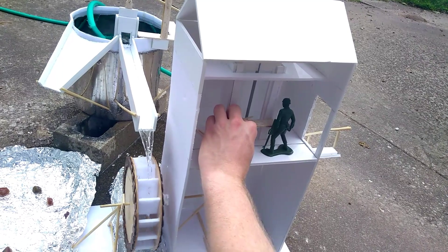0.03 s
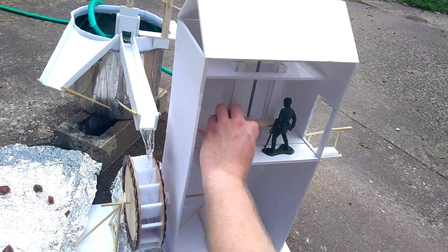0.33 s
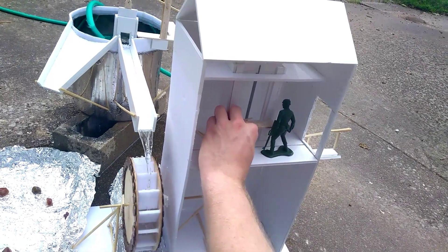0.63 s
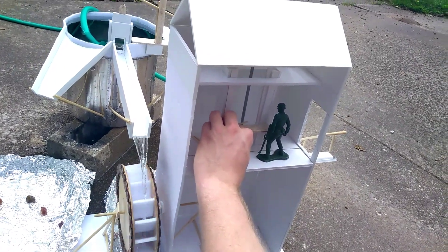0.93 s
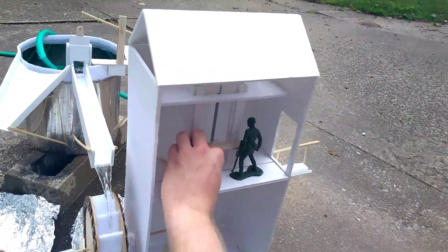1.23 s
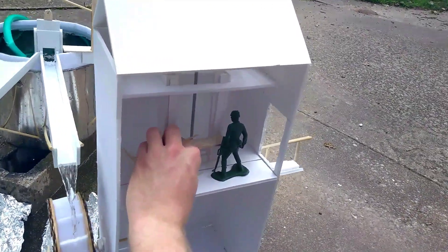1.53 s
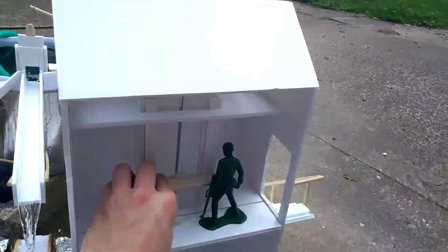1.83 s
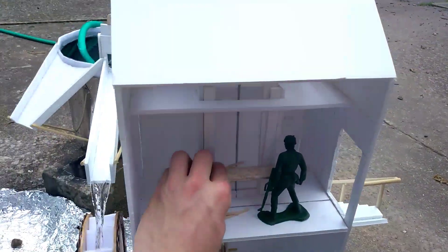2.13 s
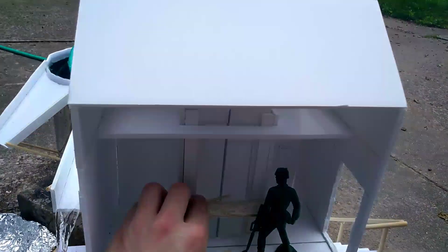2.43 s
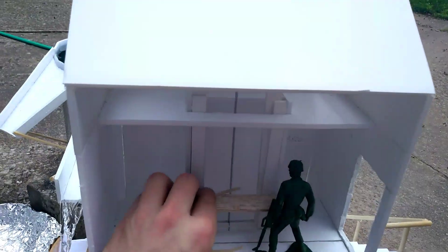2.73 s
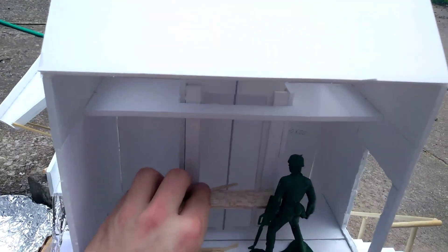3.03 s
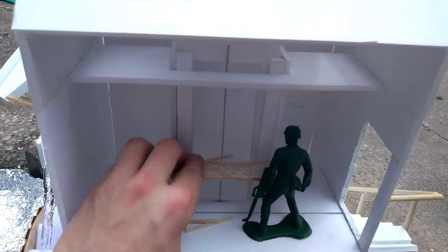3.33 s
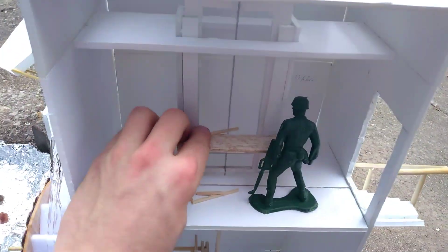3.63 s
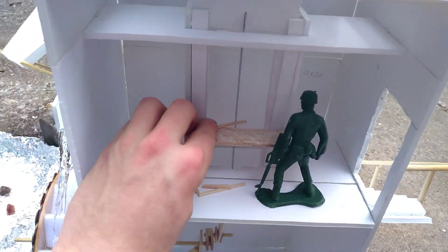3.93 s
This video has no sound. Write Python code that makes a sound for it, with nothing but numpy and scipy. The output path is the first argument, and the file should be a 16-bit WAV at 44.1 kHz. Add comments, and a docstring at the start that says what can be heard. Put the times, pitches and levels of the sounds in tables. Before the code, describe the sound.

A small hacksaw rasps through wood close by, with seven gritty cutting strokes about 0.6 seconds apart, each followed by a softer return. The teeth snag around 1.2 seconds, and the linkage knocks hollowly near 0.7, 1.2, 1.9, 2.4, 3.1 and 4 seconds. Water pours quietly over a wheel throughout, dipping between 2.5 and 3.3 seconds. A low hum fades out by 0.7 seconds.

```python
"""A small hacksaw rasps up and down through a stick of wood, driven by the water wheel of a model mill.
Each turn gives a cutting stroke that swells as the teeth tear fibres and snag, a rattle of the
linkage and a softer return stroke. Blade and wood ring, and the thin housing booms along.
Close by, outdoors, water pours over the wheel and runs off; a low hum dies away early on."""
import sys
import numpy as np
from scipy import signal
from scipy.fft import rfft, irfft, next_fast_len
from scipy.io import wavfile

SR = 44100
rng = np.random.default_rng(int(sys.argv[2]) if len(sys.argv) > 2 else 0)


def waveform_to_disk(signal):
    """Save audio, clipped to [-1, 1], as 16-bit WAV at the path in sys.argv[1]."""
    frames = np.transpose(np.atleast_2d(signal))
    scaled = np.clip(frames, -1, 1) * 32767
    samples = np.round(scaled).astype(np.int16)
    wavfile.write(sys.argv[1], SR, samples)


N = 176400

# Cutting strokes (start [s], peak [s], end [s], rasp level [dB], housing level [dB], wood ring [dB],
# blade ring [Hz], its width [Hz], its boost [dB], treble tilt [dB/octave])
CUT_STROKES = [(-.14, 0.047, .15, -31.5, -32.5, 14, 5650, 1500, 5.5, 1.5),
               (0.431, 0.595, .66, -25.5, -30.5, 18, 5770, 1400, 5, 2),
               (1.01, 1.164, 1.29, -27, -31, 14, 6470, 2600, 10, 1.4),
               (1.609, 1.785, 1.852, -23, -30.5, 13, 5230, 700, 1, -0.2),
               (2.238, 2.399, 2.456, -24.5, -33.5, 19, 8400, 700, 8, 0),
               (2.872, 3.084, 3.135, -30, -40, 14, 4940, 1200, 0, -1),
               (3.55, 3.735, 3.82, -26, -36, 11, 8200, 2000, 0, -1.1)]
# Return strokes (same columns)
RETURN_STROKES = [(0.128, 0.279, .45, -32.5, -35, 4.6, 5440, 1500, 5.4, 0.25),
                  (0.741, 0.864, 1.03, -32, -36.5, 8.9, 5550, 1700, 11.5, 0.45),
                  (1.37, 1.464, 1.63, -30, -38, 2.6, 5700, 550, 11.6, -1),
                  (1.96, 2.072, 2.3, -30.5, -39.5, 14, 5230, 1500, 1.5, -1.4),
                  (2.608, 2.687, 2.9, -43, -48, 16, 4830, 800, 2.1, -1.4),
                  (3.259, 3.35, 3.54, -37, -42, 11, 4450, 800, 3.6, -2.1),
                  (3.872, 3.945, 4.1, -38.5, -41, 8, 4630, 800, 5.1, -1)]
PAD_S = .015  # room for the fade at each end of a stroke


def saw():
    """The wheel drives the blade through the wood: a hard cut, then a lighter return."""
    out = silence()
    for row in CUT_STROKES:
        add(out, row[0] - PAD_S, stroke(*row, ends_db=-21, attack_curve=1.25, hold=2.6))
    for row in RETURN_STROKES:
        add(out, row[0] - PAD_S, stroke(*row, ends_db=-16, attack_curve=1.8, hold=1.6))
    return out


def stroke(start, peak, end, rasp_db, housing_db, wood_db, ring_hz, width_hz, ring_db, tilt_db,
           ends_db, attack_curve, hold):
    """One pass of the blade swells and stops; a higher hold keeps the pressure on for longer."""
    t = np.arange(start - PAD_S, end + PAD_S, 1 / SR)
    off_peak = np.interp(t, [start, peak, end], [1, 0, 1])
    swell_db = ends_db * off_peak ** np.where(t < peak, attack_curve, hold)
    fade = np.clip(np.minimum(t - t[0], t[-1] - t) / (2 * PAD_S), 0, 1)
    grit = teeth(speed=np.sqrt(amp(swell_db)))
    tuning = 1 + .0035 * rng.uniform(-1.1, 1)  # blade tension varies from stroke to stroke
    tone = (tuning, wood_db, tilt_db, ring_hz, width_hz)
    rasp = blade_and_wood(unit(noise(len(t)) * grit), *tone, ring_db)
    catches = blade_and_wood(snags(t, start, end), *tone, ring_db + 9)  # snags ring the blade harder
    boom = housing_boom(grit) * amp(housing_db + .56 * swell_db)  # swells less than the rasp
    return catches + housing_walls(fade * rasp * amp(rasp_db + swell_db)) + fade * boom


def teeth(speed, teeth_per_s=125, bite_decay_s=.0009, chatter_per_s=160):
    """Grit envelope: teeth tear fibres in uneven bursts while the blade chatters against the wood."""
    size = len(speed)
    tooth_rate = teeth_per_s * speed * np.exp(.65 * wander(size, teeth_per_s))
    new_tooth = np.diff(np.floor(np.cumsum(tooth_rate) / SR), prepend=0)
    depth, fibre = rng.standard_normal((2, size))
    hits = new_tooth * amp(4.5 * np.clip(depth, -2, 1))
    bites = signal.lfilter([1], [1, -np.exp(-1 / (bite_decay_s * SR))], hits)
    fibre_db = 3 * np.clip(fibre, -2, 2)
    chatter_db = 2 * speed * wander(size, chatter_per_s)
    return amp(fibre_db + chatter_db) * (1 + 2.93 * speed * bites)


# Tone of the rasp (frequency [Hz], level [dB])
RASP_EQ = [(100, -27), (600, -8), (1150, -15), (1600, 3.5), (2100, -8), (2550, 4.5), (2950, -1),
           (3500, 0.5), (4400, -0.5), (5100, 0.5), (6400, -0.5), (7400, 0), (9200, -2), (10700, -3.5),
           (11900, -4.5), (12600, 0), (14100, -13.5), (14700, -76)]
# Narrow modes of the steel blade (frequency [Hz], boost [dB])
BLADE_MODES = [(5231, 8), (5760, 7.5), (6030, 2), (7100, 7.5), (7680, 0), (8090, 4)]
BLADE_WIDTH_HZ, WOOD_HZ, WOOD_WIDTH_HZ = 50, 2090, 240


def blade_and_wood(scrape, tuning, wood_db, tilt_db, ring_hz, width_hz, ring_db):
    """Scraping excites the blade's narrow modes, its broad ring and the resonance of the stick."""
    peaks = [(hz * tuning, BLADE_WIDTH_HZ, db) for hz, db in BLADE_MODES]
    peaks += [(WOOD_HZ, WOOD_WIDTH_HZ, wood_db), (ring_hz, width_hz, ring_db)]
    return colour(scrape, RASP_EQ, tilt_db, peaks)


# Teeth catching in the wood (time [s], level [dB])
SNAG_HITS = [(0.506, -20), (0.591, -17), (0.608, -18.5), (0.778, -21.5), (0.826, -14), (.875, -15.5),
             (1.112, -12.5), (1.129, -8.5), (1.144, -14), (1.162, -13), (1.1725, -9.5), (1.188, -17),
             (1.2, -6.5), (1.2081, -6.5), (1.215, -9), (1.2186, -13), (1.231, -13), (1.2566, -8),
             (1.269, -13.5), (1.722, -14), (2.352, -10), (2.377, -11), (2.407, -14), (3.328, -22.5),
             (3.367, -25), (3.701, -16), (3.759, -16), (3.769, -18.5)]


def snags(t, start, end, rise_s=.0011, decay_s=.0017):
    """Each tooth that catches during the stroke gives a sharp tick of noise."""
    envelope = sum(amp(db) * np.clip((t - s) / rise_s, 0, 1) * np.exp(-abs(t - s) / decay_s)
                   for s, db in SNAG_HITS if start < s < end)
    return noise(len(t)) * envelope


# Knocks of the linkage (time [s], level [dB], decay [s])
KNOCK_HITS = [(0.6578, -16, 0.0091), (0.69, -13.5, 0.0053), (0.6995, -19, 0.0062), (1.2434, -17, 0.012),
              (1.8477, -10.5, 0.0045), (1.8556, -15, 0.0088), (1.896, -28, 0.0074), (2.4224, -8.5, 0.005),
              (2.429, -11, 0.0048), (2.4653, -11.5, 0.0042), (2.473, -15.5, 0.0087), (2.501, -24.5, 0.012),
              (3.123, -17, 0.0055), (3.1415, -10, 0.0048), (3.1654, -14.5, 0.010), (3.9745, -14, 0.0097)]
# Tone of their crack (frequency [Hz], level [dB])
CRACK_EQ = [(100, -14.5), (600, 0), (1100, -10.5), (1550, 3), (2050, 14), (2600, 6.5), (3400, -4),
            (4500, 0.5), (5600, 2), (8000, 0.5), (10000, -2.5), (13000, -7), (15800, -28)]


def linkage_knocks(rise_s=.00062):
    """The linkage knocks with short cracks as the blade turns round."""
    cracks, t = silence(), np.arange(SR // 6) / SR
    for s, db, decay_s in KNOCK_HITS:
        envelope = np.minimum(t / rise_s, 1) * np.exp(-t / decay_s)
        add(cracks, s, amp(db) * envelope * noise(len(t)))
    return colour(cracks, CRACK_EQ)


# Broad body of the housing (frequency [Hz], level [dB])
HOUSING_EQ = [(40, -23), (110, -3), (200, -6), (300, -7.5), (400, -6.5), (510, -0.5), (700, -1.5),
              (950, -4.5), (1200, -10), (1700, -11.5), (2500, -24), (6000, -57.5)]
# Its modes (frequency [Hz], level [dB], time to fall 60 dB [s])
HOUSING_MODES = [(260, -9, 0.19), (332.7, -4.5, 0.14), (488, -4.5, 0.15), (524.3, -2, 0.11),
                 (648.6, -1, 0.11), (766.2, 1, 0.11), (950, -9, 0.18), (1580, -10.5, 0.044),
                 (1866, -5, 0.083)]


def housing_boom(grit):
    """The sawing shakes the thin housing: ringing modes over a dull rush."""
    shake = unit(noise(len(grit)) * grit)
    ring = sum(amp(db) * resonate(shake, hz, width_hz=np.log(1000) / np.pi / t60)
               for hz, db, t60 in HOUSING_MODES)
    return unit(colour(noise(len(grit)), HOUSING_EQ) + amp(-.5) * unit(ring))


# Heavier blows of the linkage (time [s], level [dB], struck pitch [Hz], damping time [s])
THUMP_HITS = [(0.6574, -20.5, 710, 0.1), (0.691, -22.5, 527, .03), (1.244, -20.5, 520, 0.15),
              (1.856, -17, 266, 0.05), (2.474, -28.5, 715, 0.077), (3.143, -27.5, 300, 0.054),
              (3.974, -23.5, 700, .05)]


def housing_thumps(rise_s=.0065, focus_db_per_octave=6.5, detune=.03):
    """Each blow lands on a different spot of the housing and favours the modes near its pitch."""
    thumps, t = silence(), np.arange(SR // 6) / SR
    for s, thump_db, struck_hz, damping_s in THUMP_HITS:
        ring = 0
        for hz, db, t60 in HOUSING_MODES:
            gain = amp(db - focus_db_per_octave * abs(np.log2(hz / struck_hz)))
            bent_hz = hz * (1 + detune * rng.uniform(-1, 1))
            ring += gain * amp(-60 * t / t60) * np.sin(2 * np.pi * (bent_hz * t + noise(1)))
        envelope = np.minimum(t / rise_s, 1) * np.exp(-t / damping_s)
        add(thumps, s, amp(thump_db) * envelope * ring)
    return thumps


def housing_walls(x, decay_s=.0026, wet_db=2):
    """Quick reflections inside the housing colour each stroke a little differently."""
    t = np.arange(SR // 60) / SR
    taps = noise(len(t)) * np.exp(-t / decay_s)
    taps *= amp(wet_db) / np.linalg.norm(taps, axis=1, keepdims=True)
    taps[:, 0] += 1  # direct sound
    taps /= np.linalg.norm(taps, axis=1, keepdims=True)
    return signal.fftconvolve(x, taps, axes=1)[:, :x.shape[1]]


# Tone of the wash (frequency [Hz], level [dB])
WASH_EQ = [(25, -8), (48, -7.5), (68, 7.5), (130, 2.5), (250, 0), (420, -4.5), (750, -8), (1200, -9),
           (1900, -13), (3000, -10), (5000, -23), (8000, -21.5), (13000, -20), (14200, -27), (14900, -73)]
# Fader ride of the water on the wheel (time [s], gain [dB])
WATER_FADER = [(0, -38), (.7, -38.5), (1.4, -39.5), (1.9, -39), (2.42, -40.5), (2.57, -48.5), (2.9, -47),
               (3.25, -44), (3.6, -40.5), (3.86, -38), (4, -35)]


def wheel_water(pitches=24, drops_per_s=210, decay_cycles=7.9, glide=.0995):
    """Water pours over the wheel: a fluttering wash, and drops whose bubbles chirp upward."""
    drops = silence()
    for hz in np.geomspace(500, 7000, pitches) * rng.uniform(.93, 1.07, pitches):
        t = np.arange(int(5 * decay_cycles / hz * SR)) / SR
        age = t * hz / decay_cycles
        envelope = (1 - np.exp(-10 * age)) * np.exp(-age)
        bubble = envelope * np.sin(2 * np.pi * hz * t * (1 + glide * age / 2))
        for at in np.flatnonzero(rng.random(N) < drops_per_s / pitches / SR):
            add(drops, at / SR, bubble * np.sign(noise(1)) * amp(-4.5 * min(rng.exponential(), 2)))
    wash = colour(noise(N) * amp(3.6 * wander(N, per_s=45)), WASH_EQ)
    return (wash + amp(-8.5) * unit(drops)) * amp(curve(WATER_FADER, np.arange(N) / SR))


# Fader ride of the hum (time [s], level [dB])
HUM_FADER = [(0, -32.5), (.14, -32.5), (.26, -41), (.42, -33), (.6, -32.5), (.7, -60), (1, -75)]


def hum(hz=97.2, waver=.026):
    """A low, wavering tone that dies away within the first second."""
    pitch_hz = hz * (1 + waver * wander(N, per_s=23))
    tone = np.sqrt(2) * np.sin(2 * np.pi * np.cumsum(pitch_hz) / SR)
    return tone * amp(curve(HUM_FADER, np.arange(N) / SR))


# Tone of the run-off (frequency [Hz], level [dB])
RUN_OFF_EQ = [(2200, -19), (3300, -2), (13000, -7), (14500, -55)]


def run_off(level_db=-56.5):
    """Water trickles away with a faint, steady hiss."""
    return amp(level_db) * colour(noise(N), RUN_OFF_EQ)


# Phase lead of the left side (frequency [Hz], lead [rad])
LEFT_LEAD = [(30, 2.5), (90, 2.5), (180, 1.08), (330, 0.51), (1600, 0), (1980, 3), (2600, 3), (3200, 5.5),
             (3650, 7), (4250, 8.5), (4800, 10), (5400, 14), (6200, 13), (6550, 17), (7300, 16.5),
             (7900, 20), (8450, 19), (9000, 23), (10000, 26.5), (11000, 26), (14000, 44.5)]
# Stereo balance (frequency [Hz], left minus right [dB])
BALANCE = [(50, 1.5), (160, 3.5), (600, -1), (1000, -1), (1700, 3), (2200, 0.5), (2600, -3), (3400, 2),
           (4900, -5), (5500, -1.5), (6800, -2), (10000, 0.5), (14000, 0)]
# Scattered sound against direct sound (frequency [Hz], level [dB])
SCATTER_SEND = [(30, -4.5), (150, -2), (330, -3.5), (1100, -13.5), (1650, -0.5), (2050, -7), (2250, -77),
                (2550, -14), (2950, -2), (3400, -11), (4200, -3), (5600, -6), (7000, -2), (14000, -2)]


def stereo_pair(paths):
    """Two microphones share the direct sound with a lag; each gets its own scatter."""
    size = next_fast_len(N + SR // 4)
    hz, spectra = np.fft.rfftfreq(size, 1 / SR), rfft(paths, size)
    wet, side = eq_gain(SCATTER_SEND, hz), np.array([[.5], [-.5]])
    blend = (spectra[0] + wet * spectra[1:]) / np.sqrt(1 + wet ** 2)
    placement = eq_gain(BALANCE, hz) ** side * np.exp(1j * side * curve(LEFT_LEAD, hz))
    return irfft(blend * placement, size)[:, :N]


def noise(size):
    """White noise on three paths: direct, scattered left, scattered right."""
    return rng.standard_normal((3, size))


def silence():
    """An empty mix of the three paths."""
    return np.zeros((3, N))


def amp(db):
    """Decibels to gain."""
    return 10 ** (np.asarray(db) / 20)


def unit(x):
    """Scales to rms 1."""
    return x / np.sqrt(np.mean(x ** 2) + 1e-20)


def curve(points, at):
    """Straight lines between points."""
    return np.interp(at, *np.transpose(points))


def eq_gain(points, hz):
    """Gain from (frequency [Hz], level [dB]) points on a log axis."""
    f, db = np.transpose(points)
    return amp(np.interp(np.log(hz + 1), np.log(f + 1), db))


def colour(x, points, tilt_db=0, peaks=()):
    """EQ with tilt and peaks (frequency [Hz], width [Hz], boost [dB]); keeps white noise's power."""
    hz = np.fft.rfftfreq(4096, 1 / SR)
    peak_power = sum(amp(db) ** 2 / (1 + (2 * (hz - f) / width) ** 2) ** 1.5 for f, width, db in peaks)
    tilt = amp(tilt_db * np.log2((hz + 500) / 5000))
    gain = unit(eq_gain(points, hz) * np.sqrt(1 + peak_power) * tilt)
    log_gain = np.log(np.r_[gain, gain[-2:0:-1]] + 1e-6)
    taps = np.fft.ifft(np.exp(np.conj(signal.hilbert(log_gain)))).real[:len(hz)]  # minimum phase
    return signal.fftconvolve(x, taps[None], axes=1)[:, :x.shape[1]]


def resonate(x, hz, width_hz):
    """One resonance of gain 1."""
    r = np.exp(-np.pi * width_hz / SR)
    return 2 * signal.lfilter([1 - r], [1, -r * np.exp(2j * np.pi * hz / SR)], x).real


def add(mix, s, sound):
    """Mixes a sound in at s seconds."""
    at = round(s * SR)
    sound = sound[..., max(-at, 0):]
    part = mix[..., max(at, 0):][..., :sound.shape[-1]]
    part += sound[..., :part.shape[-1]]


def wander(size, per_s):
    """Slow random modulation."""
    knots = rng.standard_normal(int(size / SR * per_s) + 3)
    return np.interp(np.arange(size) / SR * per_s, np.arange(len(knots)), knots)


def scene():
    """The saw and its linkage in front, hum and water underneath, spread into stereo."""
    mill = saw() + linkage_knocks() + housing_thumps()
    mill[0] += hum()  # direct path only
    return stereo_pair(mill + run_off() + wheel_water())


def record(dry, cutoff_hz=15900):
    """A steep low-pass trims the top treble."""
    taps = signal.firwin(255, cutoff_hz, window=("kaiser", 9), fs=SR)
    return signal.oaconvolve(dry, taps[None], "same")


dry = scene()
out = record(dry)
waveform_to_disk(out)
```